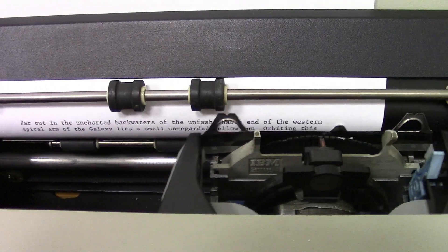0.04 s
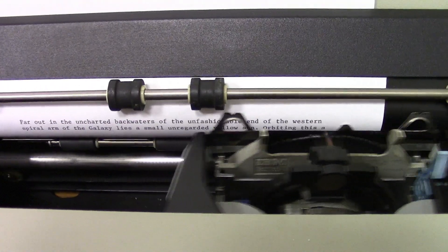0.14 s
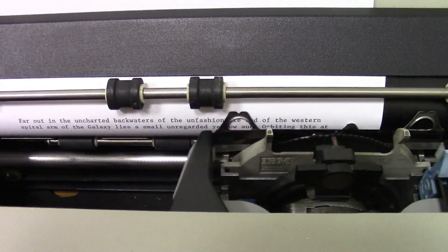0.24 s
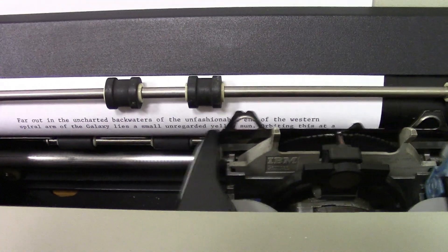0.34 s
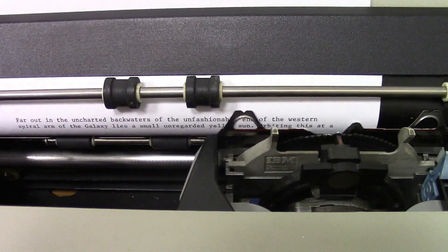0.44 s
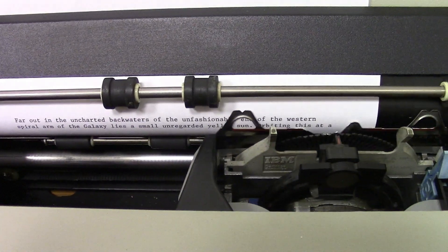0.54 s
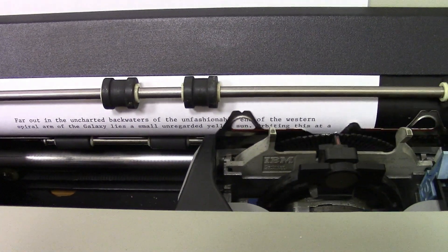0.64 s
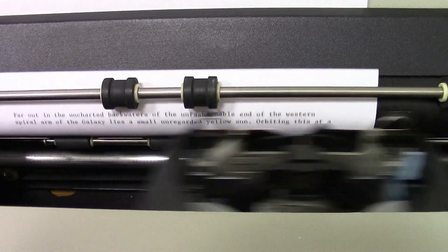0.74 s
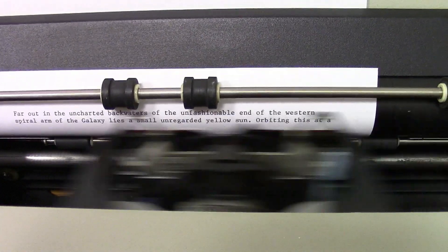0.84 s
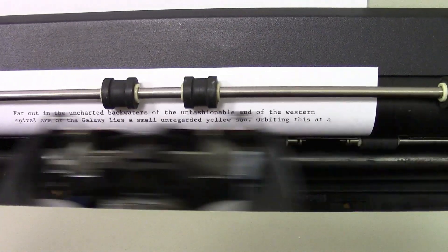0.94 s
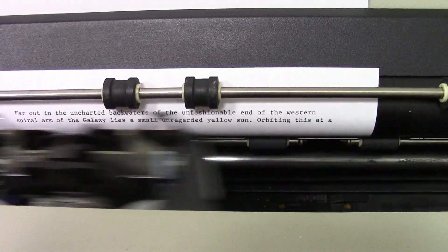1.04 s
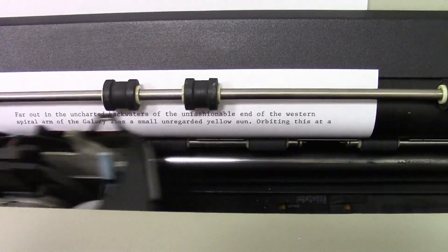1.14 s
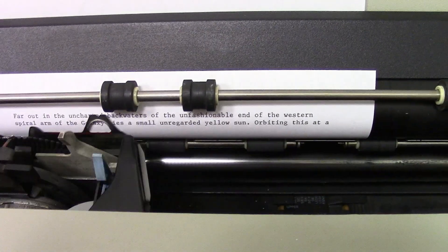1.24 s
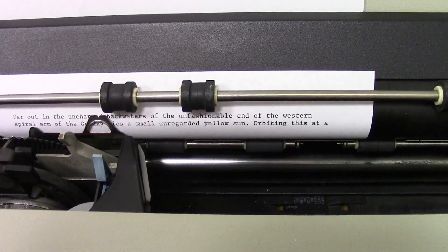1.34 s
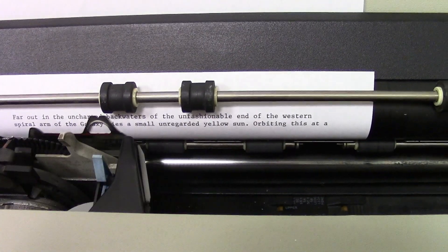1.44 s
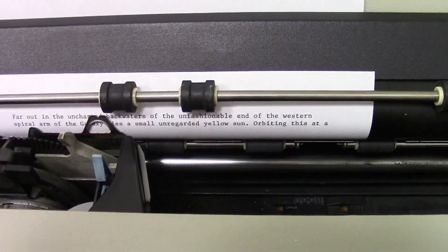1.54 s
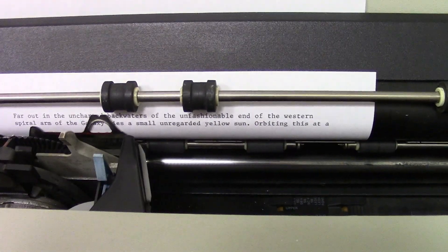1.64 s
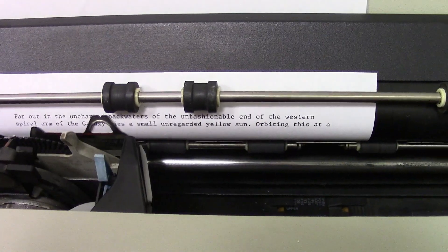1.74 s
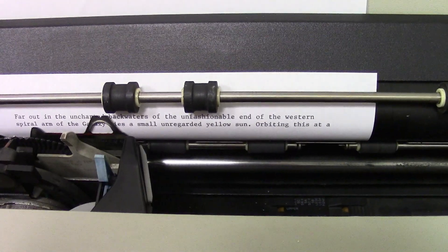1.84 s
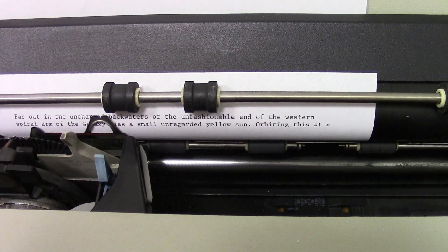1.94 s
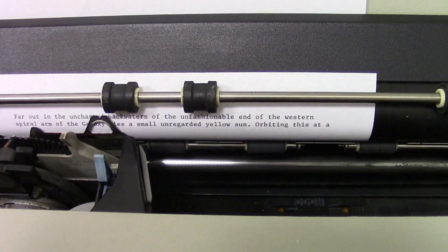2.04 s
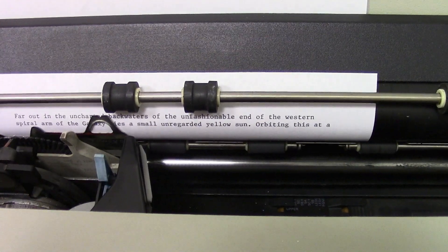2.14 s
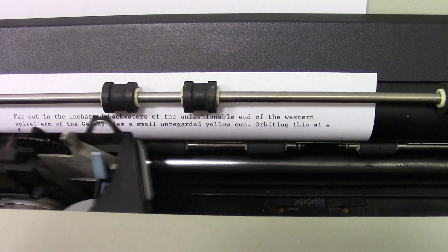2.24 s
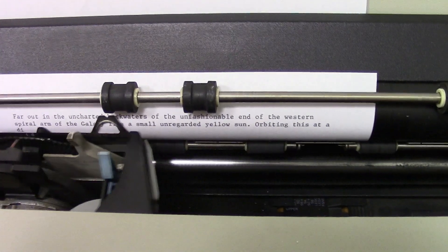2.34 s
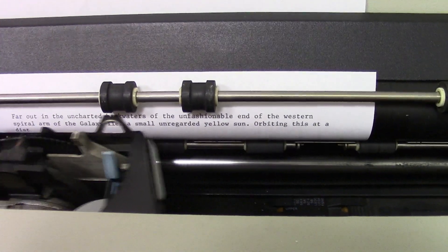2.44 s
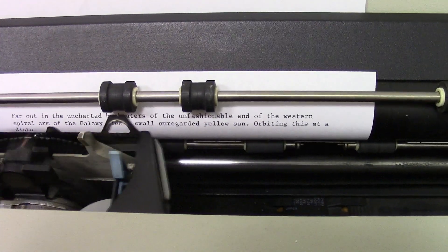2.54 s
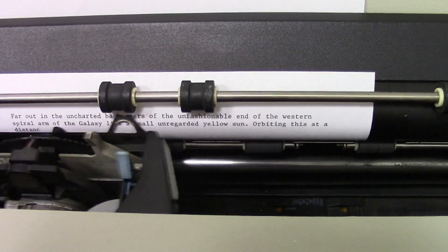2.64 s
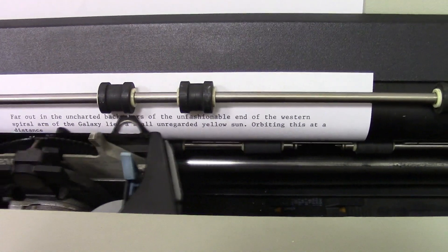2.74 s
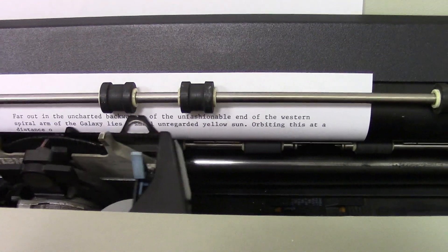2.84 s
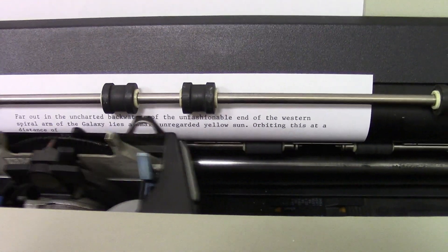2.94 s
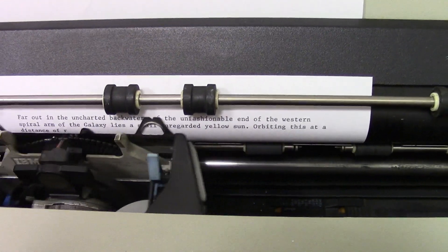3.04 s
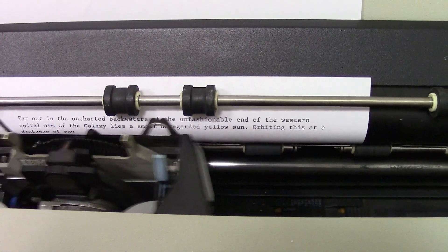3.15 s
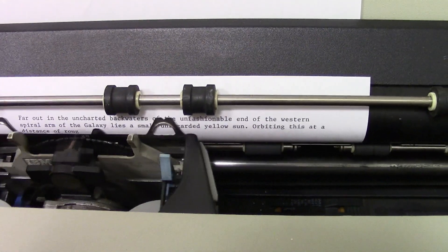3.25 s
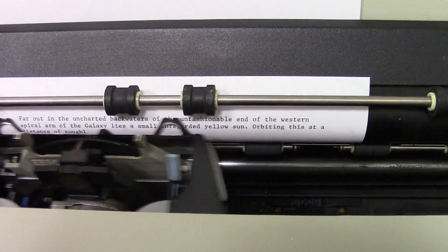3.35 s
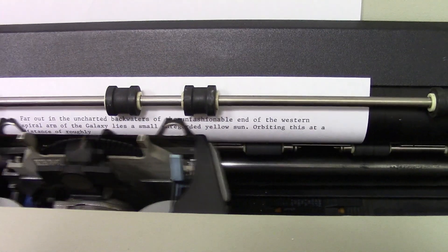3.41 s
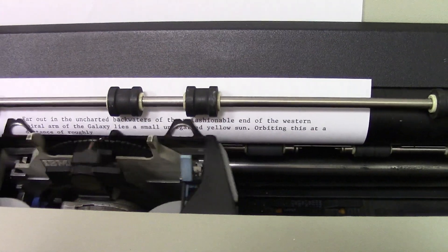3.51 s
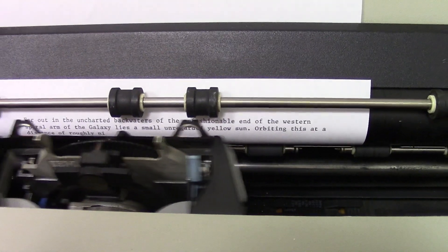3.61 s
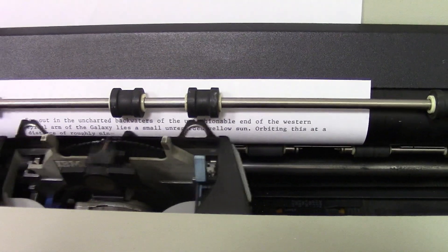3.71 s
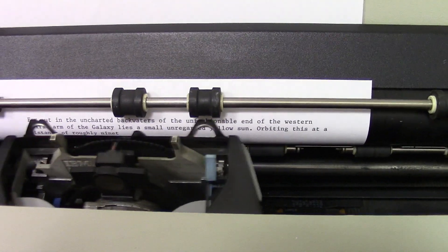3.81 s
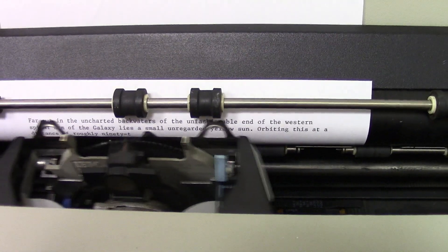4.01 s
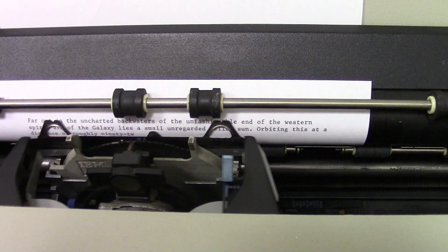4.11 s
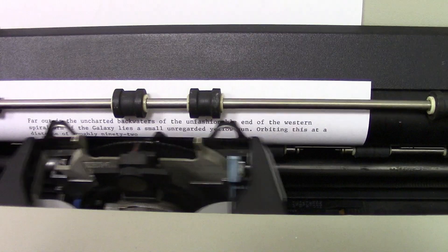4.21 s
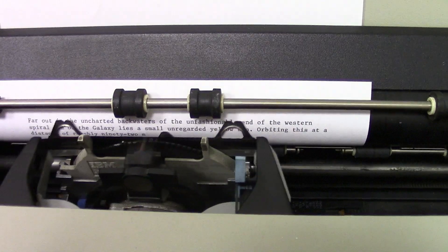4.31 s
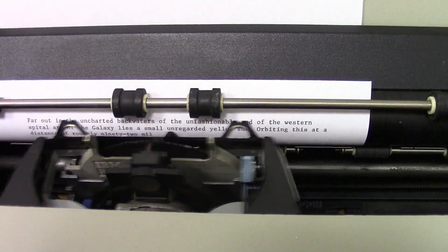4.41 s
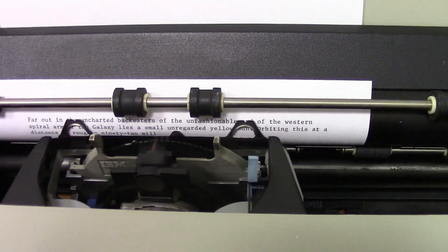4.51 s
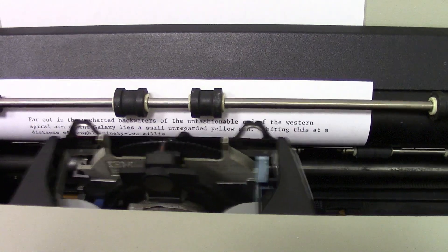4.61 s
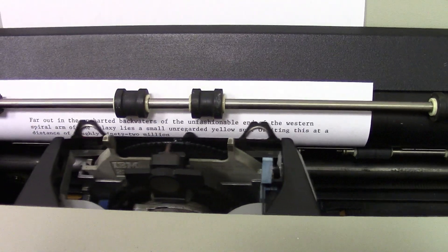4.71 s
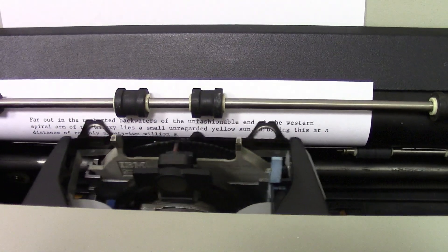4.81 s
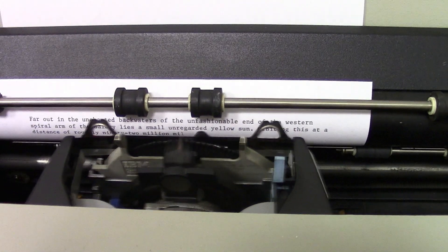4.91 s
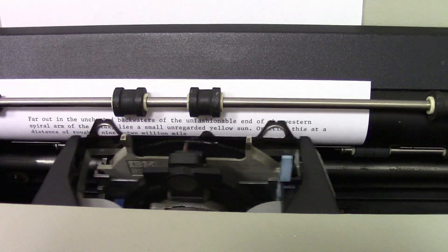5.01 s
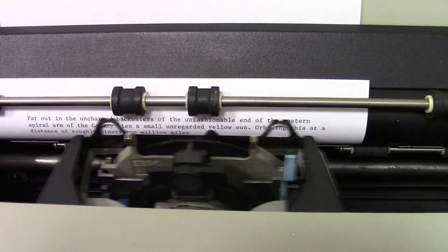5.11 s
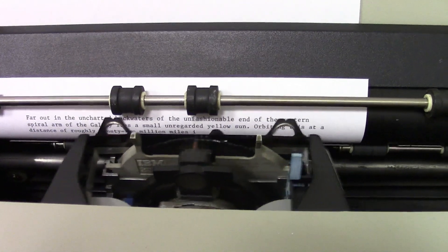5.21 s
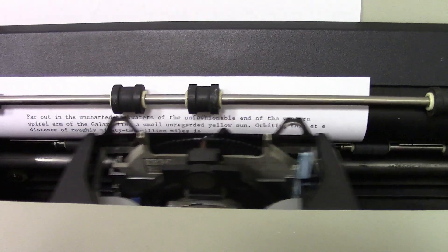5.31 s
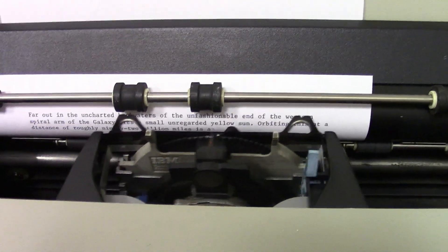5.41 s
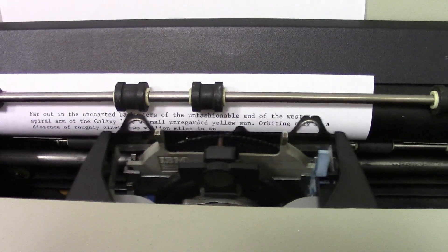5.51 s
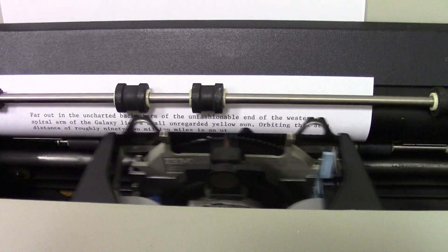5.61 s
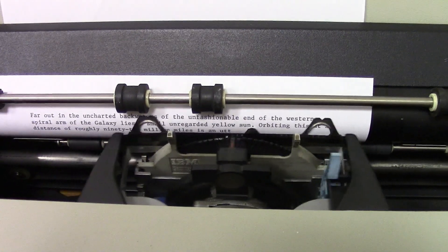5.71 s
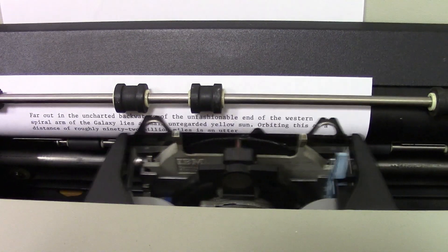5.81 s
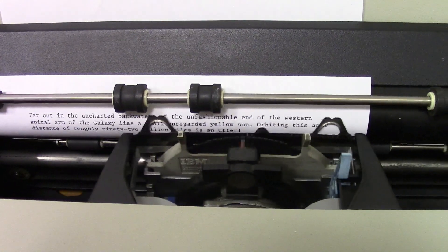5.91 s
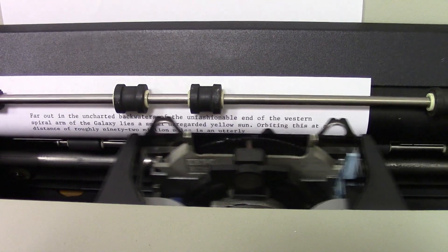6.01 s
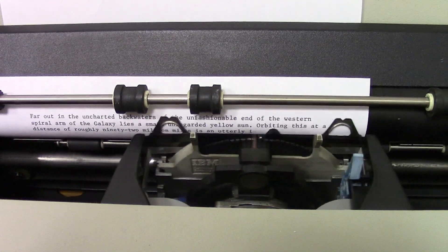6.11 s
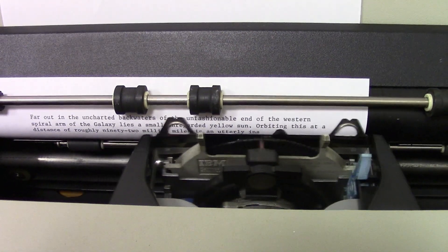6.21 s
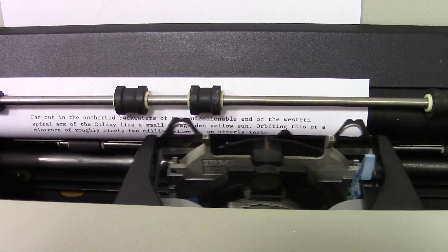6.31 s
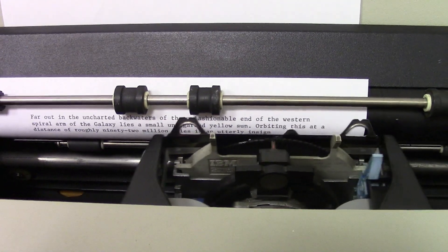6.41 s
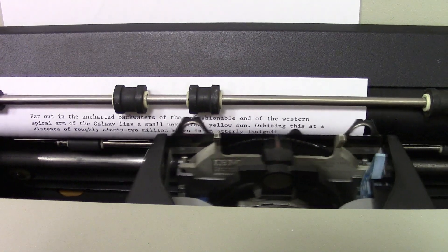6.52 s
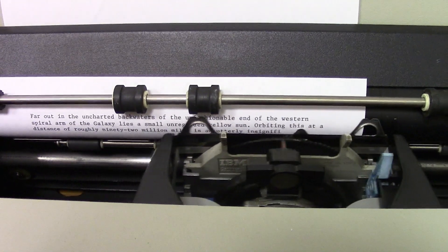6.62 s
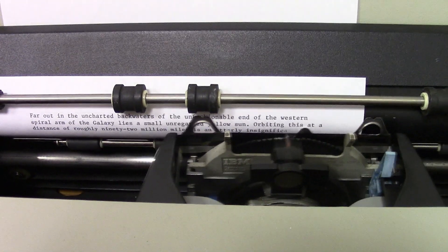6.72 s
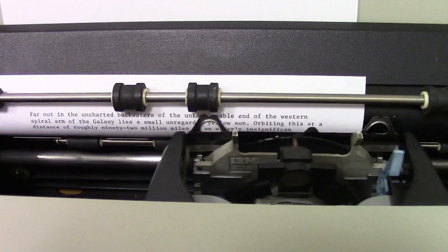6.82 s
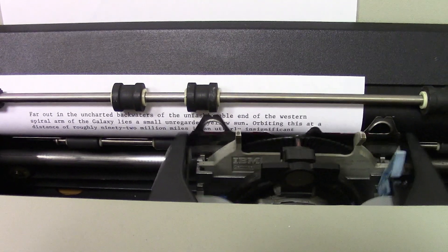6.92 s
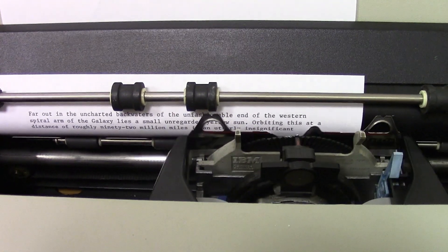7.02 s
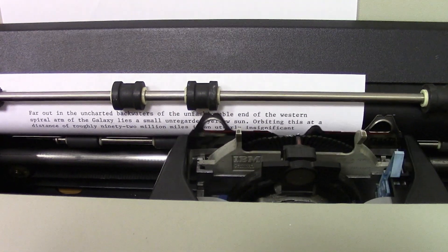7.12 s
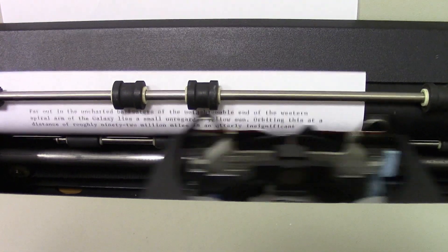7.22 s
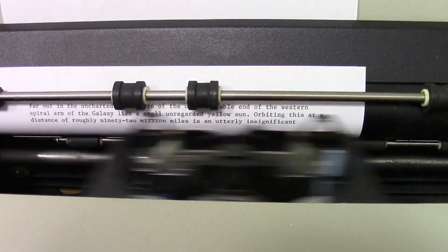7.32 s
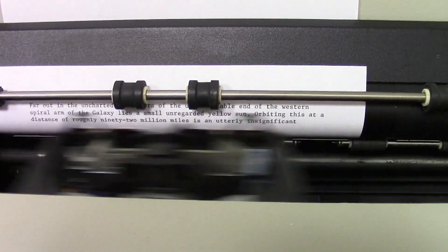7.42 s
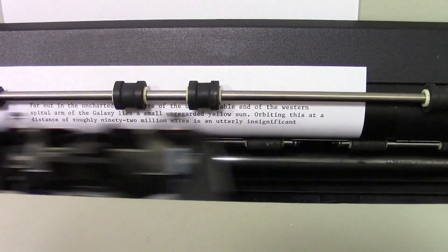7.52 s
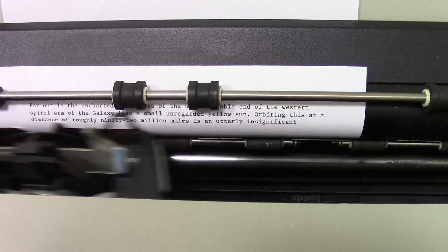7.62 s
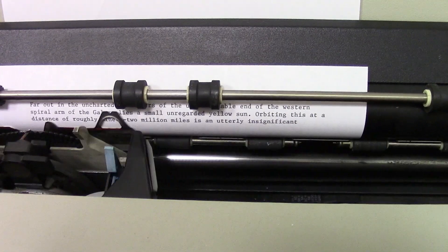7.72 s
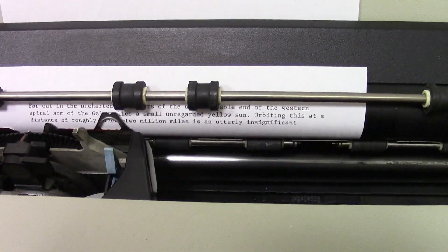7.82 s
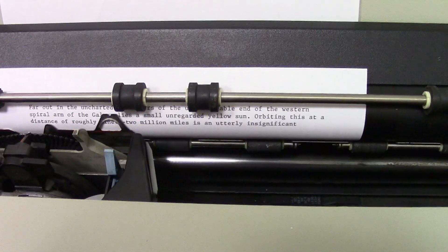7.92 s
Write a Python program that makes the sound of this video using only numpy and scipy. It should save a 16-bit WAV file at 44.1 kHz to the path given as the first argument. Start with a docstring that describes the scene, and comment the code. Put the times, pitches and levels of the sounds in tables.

```python
"""The hammer of an electric daisy-wheel typewriter strikes letters close by in a quiet room: each blow rings
damped modes of the hammer, type and platen. The carriage motor's steps excite resonances of case and desk;
the print wheel hums through the frame, and loose parts rattle as shaped noise. Twice the carriage whirs back
on its toothed belt, a sum of overtones of the motor's step rate, with jolts for starts, stops and paper feed.
Behind it lie a decaying room echo, air noise and a mains hum."""
import sys
import numpy as np
from scipy import signal
from scipy.fft import rfft, irfft, next_fast_len
from scipy.io import wavfile
from scipy.ndimage import uniform_filter1d, minimum_filter1d, map_coordinates

SR = 44100
rng = np.random.default_rng(int(sys.argv[2]) if len(sys.argv) > 2 else 0)


def convert_level_to_amplitude(level_db):
    """Map a level in decibels to its linear amplitude factor."""
    exponent = np.asarray(level_db, float) / 20
    return 10 ** exponent


def transcribe(u):
    """Save the signal u as a 16-bit wav file named by the first command-line argument.

    u: samples, shape (n,) or (channels, n), limited to [-1, 1]; the rate is SR.
    q: integer samples, one column per channel.
    """
    v = np.clip(np.atleast_2d(u).T, -1, 1)
    q = np.round(v * 32767).astype(np.int16)
    wavfile.write(sys.argv[1], SR, q)


N = 350595
LEAD = SR // 4  # samples kept before the start, for events that begin early
COLUMN_S = .0624  # one print cycle

# hammer blows: start_s, level_db
STRIKES = [(0.0296, -7.0), (0.096, -7.0), (0.2206, -8.0), (0.2831, -7.5), (0.4078, -7.5), (2.3262, -7.0),
           (2.3924, -7.0), (2.4588, -7.0), (2.5231, -6.0), (2.5854, -6.5), (2.6478, -6.0), (2.7102, -6.5),
           (2.7725, -6.5), (2.8974, -7.5), (2.967, -7.0), (3.0918, -7.0), (3.1541, -7.0), (3.2162, -6.0),
           (3.2786, -5.5), (3.3525, -5.5), (3.4151, -7.0), (3.4967, -6.5), (3.6215, -7.5), (3.6839, -7.0),
           (3.7464, -6.5), (3.8087, -6.5), (3.872, -7.0), (3.9344, -6.0), (4.0119, -13.0), (4.0932, -7.5),
           (4.1593, -6.0), (4.2255, -7.5), (4.3501, -7.0), (4.4127, -8.0), (4.4843, -7.5), (4.5467, -8.0),
           (4.6183, -8.0), (4.6807, -7.5), (4.743, -7.5), (4.8676, -6.0), (4.9302, -8.0), (5.0018, -7.5),
           (5.0682, -8.0), (5.1306, -8.0), (5.2554, -9.0), (5.3218, -8.5), (5.4466, -8.5), (5.5089, -7.5),
           (5.6335, -6.5), (5.6961, -7.0), (5.7585, -7.5), (5.8208, -6.0), (5.8832, -6.5), (5.9456, -6.5),
           (6.0271, -6.5), (6.1519, -6.5), (6.2143, -6.0), (6.2767, -5.5), (6.3431, -6.0), (6.4052, -6.0),
           (6.468, -7.5), (6.5304, -7.5), (6.6039, -7.5), (6.6776, -8.0), (6.7417, -7.5), (6.8041, -7.0),
           (6.8666, -7.0), (6.929, -7.0)]
# carriage place along the line: time_s, place (0 left, 1 right)
PLACE = [(0, .9), (.5, 1), (2.3, 0), (6.95, 1)]
# modes of hammer, type and platen: pitch_hz, t60_s, then level_db at left, one third, two thirds, right
PLATEN_MODES = [(560, .046, 8.5, -2, -5, -17), (654, 0.059, 1, -8, -3, -13), (900, 0.029, -5, -20, -3, -3),
                (1310, 0.035, 1, 3.5, 5, 1), (1504, 0.033, 8, 9.5, 4, 5), (1820, 0.02, 13.5, 3.5, 4, 0),
                (2362, 0.035, 8.5, 10.5, 10.5, 3.5), (2734, 0.022, -8, -29, -4, 3.5),
                (2927, 0.031, 5, 0.5, 5, 9.5), (3172, 0.024, 10, 12, 11, 9), (3443, 0.045, 2, 8, -12, -7),
                (3647, 0.015, 0, 4, 13.5, 14), (3807, 0.023, -10, 2, 19, 20.5),
                (3933, 0.037, 14.5, 15, 9.5, 15.5), (4170, .0216, 14, 19.5, 4, 12.5),
                (4506, 0.016, 15, 15, 10.5, 10), (4586, .013, 13, 5, 7, 4), (4994, 0.038, 1, 4, 6, 2),
                (5210, .0144, 1, -1, 11, 16), (5796, 0.021, 4, 12, 16.5, 14.5),
                (6180, 0.011, 2, 7, 12.5, 17.5), (6230, 0.016, 3.5, 15, 11, 7),
                (6590, 0.023, 4, 5.5, 3, -8), (7020, 0.033, 1, 0, 3, -2), (7600, 0.064, -14, -16, -7, -14),
                (8500, 0.0048, -2, -9, 1, -7), (8720, 0.021, 1, 0, 0, -9), (9050, 0.033, -6, 1, 1, -4)]
# noise spectrum of the blow: frequency_hz, relative_level_db (per Hz)
CRACK_SPECTRUM = [(410, -49), (700, -31), (1040, -11), (1450, 4), (2800, -2.5), (3990, 13.5), (4860, -8),
                  (5920, 4.5), (7590, -18.5), (9110, -15), (12000, -21.5), (16000, -32)]
# contacts of one stroke (hammer sets off, type lands, hammer falls back on its stop):
# after_s, level_db (relative to the blow), time_scatter_s, mode_scatter_db
STROKE_CONTACTS = [(-.0016, -21, .00005, 3), (.0012, 0, 0, 1.4), (.0212, -19, .0003, 5)]
# motor steps of one column advance: after_s (from the cycle's start), push (signed, relative)
ADVANCE_STEPS = [(0, 1.48), (.004, -0.9), (0.0095, -0.15), (0.015, -1.36), (.022, 0.5), (0.025, -2),
                 (0.034, 1), (0.0406, -1), (.049, -0.6), (.056, 1.4)]
# resonances of the case: centre_hz, width_hz, gain_db
CASE_MODES = [(225.4, 13.7, -15), (242.2, 13, -12), (262, 35.5, -9), (340.9, 10, -7.5), (426.8, 32, -7),
              (512, 54, -7), (565, 114, -11.5), (792, 100, -17), (893, 31.6, -12), (1252, 100, -22.5)]
# long-ringing modes of desk and frame: centre_hz, width_hz, delay_s, then gain_db at left, middle, right
DESK_MODES = [(31.12, 4.7, 0.0134, 30, 26, 25), (81, 10, 0.0145, 14, 24, 15),
              (110.2, 14.3, 0.01518, 31.5, 25.3, 24.9), (289.5, 16, .036, 29, 33.8, 36.5)]
# turns of the wheel motor to the next letter: middle_s, length_s (before stretching),
# hum_db (relative drive of the frame), whirr_db
WHEEL_TURNS = [(0.006, 0.022, -31, -40), (0.067, 0.056, -30.5, -36), (0.133, 0.036, -27.5, -39),
               (0.2, 0.042, -32, -41), (0.259, 0.053, -31.0, -40), (0.317, 0.039, -26.5, -40.5),
               (0.384, 0.029, -26.5, -41), (0.452, 0.036, -31, -41), (0.498, 0.067, -54, -45.5),
               (2.282, 0.084, -49, -47), (2.352, 0.055, -31, -35), (2.423, 0.057, -32, -35),
               (2.484, 0.064, -33.0, -32.5), (2.54, 0.043, -36, -31.5), (2.613, 0.061, -35, -40),
               (2.673, 0.063, -37.5, -42), (2.734, 0.044, -37, -39), (2.792, 0.056, -38, -52),
               (2.871, 0.046, -37, -51), (2.931, 0.047, -33, -35), (2.998, 0.058, -33, -39),
               (3.067, 0.037, -34, -47), (3.121, 0.056, -32.5, -37), (3.183, 0.049, -32, -35),
               (3.25, 0.034, -36, -43), (3.315, 0.055, -32, -39), (3.385, 0.063, -38, -42),
               (3.45, 0.058, -33, -39), (3.524, 0.057, -33, -45), (3.597, 0.045, -34, -42),
               (3.652, 0.06, -33.5, -43), (3.71, 0.052, -33, -38), (3.774, 0.048, -34.5, -37),
               (3.835, 0.053, -32, -36.0), (3.896, 0.043, -35, -34.5), (3.97, 0.056, -35.5, -34.5),
               (4.049, 0.056, -38, -35), (4.12, 0.066, -41, -40), (4.193, 0.049, -31, -35),
               (4.26, 0.051, -34, -35.5), (4.324, 0.036, -37, -49), (4.387, 0.05, -34.0, -38),
               (4.445, 0.057, -35.5, -35), (4.516, 0.057, -32, -38), (4.576, 0.063, -36.0, -33),
               (4.639, 0.05, -31, -36), (4.702, 0.047, -31.5, -31), (4.764, 0.065, -33, -35),
               (4.849, 0.047, -34, -44), (4.899, 0.07, -32, -35), (4.962, 0.057, -32.5, -34),
               (5.028, 0.05, -38, -32), (5.095, 0.043, -30, -31.5), (5.163, 0.051, -31.0, -37.5),
               (5.235, 0.036, -32, -42), (5.291, 0.048, -31, -36), (5.349, 0.048, -27, -37),
               (5.425, 0.047, -40, -45), (5.478, 0.039, -28.5, -40), (5.542, 0.049, -29, -38),
               (5.613, 0.033, -33, -42), (5.667, 0.05, -32, -35), (5.728, 0.054, -28, -36),
               (5.784, 0.055, -32, -34), (5.852, 0.04, -27, -32), (5.913, 0.048, -26.5, -35),
               (5.979, 0.057, -33, -34), (6.06, 0.041, -26.5, -35), (6.13, 0.057, -34.0, -43),
               (6.183, 0.041, -31.5, -31.5), (6.243, 0.041, -26, -33), (6.31, 0.045, -25, -34),
               (6.373, 0.039, -27.5, -39), (6.448, 0.039, -37, -38), (6.499, 0.039, -28, -44),
               (6.573, 0.049, -31, -44), (6.644, 0.046, -30, -39), (6.714, 0.037, -27.5, -40),
               (6.781, 0.048, -30.5, -42), (6.84, 0.049, -31, -43), (6.908, 0.067, -31.5, -40),
               (6.968, 0.04, -32, -40), (7.034, 0.09, -67, -46)]
# the wheel starts, brakes or settles: start_s, level_db, clack_pitch_hz
WHEEL_CLACKS = [(.004, -23.5, 2960), (0.173, -22.5, 2870), (0.3551, -22.5, 2785), (.477, -33, 2540),
                (0.5235, -29.5, 2220), (.556, -40, 2570), (2.25, -25, 3380), (2.292, -29.5, 2770),
                (2.8497, -29.5, 2652), (3.049, -27, 2743), (3.5698, -30.5, 2860), (4.3015, -22, 2820),
                (4.811, -24, 2880), (4.845, -30, 1607), (5.207, -26.5, 3040), (5.2297, -44, 2870),
                (5.398, -24, 3050), (5.5853, -25.5, 3170), (6.095, -22.5, 2770), (7.001, -24, 2966),
                (7.043, -34, 3060), (7.089, -40, 3030)]
# loose parts clack during the returns: start_s, level_db, clack_pitch_hz
RETURN_CLACKS = [(.756, -48, 2490), (.815, -44, 2500), (.885, -44, 1750), (1.18, -43, 1630),
                 (1.265, -45, 3400), (1.383, -42.5, 1630), (1.41, -48, 2295), (7.281, -45, 3080),
                 (7.283, -51, 4200), (7.39, -47, 3887), (7.41, -44, 1730), (7.66, -43, 1600),
                 (7.695, -47, 2450), (7.872, -44.5, 1600), (7.9, -49, 1660)]
# small contacts in every cycle: after_s (from the blow), level_db (shifted by the blow's level),
# rise_s (time constant), t60_s, tilt_db (per octave)
CYCLE_CONTACTS = [(-.0016, -26, .0004, .03, 2), (.001, -24.5, .004, 0.13, -1),
                  (0.0209, -27.5, .0008, 0.073, 2.5), (.039, -30, .0015, 0.038, -1)]
# noise spectrum of the loose parts: frequency_hz, relative_level_db (per Hz)
RATTLE_SPECTRUM = [(410, -9), (700, -3.5), (898, -7), (1380, -7.5), (1560, -4.5), (2020, -9.5), (2800, -4),
                   (4860, -12), (6070, -13.5), (7990, -19), (8760, -14), (9860, -24.5), (16000, -52)]
# carriage returns: start_s, brake_s, top_speed_hz (motor steps), belt_db, belt_tilt_db (per octave)
RETURNS = [(0.751, 1.106, 653.5, -36.5, 0.9), (7.272, 7.59, 644.5, -37.5, -0.5)]
# motor overtones: multiple of the step rate, relative level_db in the first return, in the second
WHINE_OVERTONES = [(1, 13, 10.5), (3, 4.5, 6), (5, -4, -7), (6, -7, -8), (8, -3, -8), (9, -8, -17),
                   (10, -7, -11), (11, -8, -17), (13, -10, -9), (14, -19, -27)]
# belt overtones: multiple of the tooth rate, relative level_db
TOOTH_OVERTONES = [(1, -2), (2, -13), (3, -29), (4, -30), (5, -21)]
# the carriage gathers speed: after_s (from the start), speed (share of top speed)
SPEED_UP = [(0, .42), (.05, .62), (.1, .78), (.15, .93), (.195, 1)]
# the carriage brakes: after_s (from braking), speed (share of top speed)
SLOW_DOWN = [(0, 1), (.04, .92), (.075, .79), (.105, .62), (.135, .45), (.165, .27), (.2, .18), (.26, .096)]
# the frame's answer to the whine: frequency_hz, gain_db
FRAME_RESPONSE = [(100, -10), (290, -8), (430, -7), (600, -2), (900, 11), (1100, 3), (1350, 1), (1600, 8),
                  (1800, 0), (1950, 2)]
# desk rumble against speed: speed (share of top speed), level_db (before braking)
DESK_RUMBLE = [(.09, -68), (.17, -36), (.3, -42), (.42, -43), (.62, -47.5), (.9, -42.5), (1, -64)]
# jolts as a return starts: after_s, level_db (drive of the case), t60_s
START_JOLTS = [(.002, -32, 0.17)]
# jolts after braking begins, from the stop and the paper feed: after_s, level_db (drive of the case), t60_s
STOP_JOLTS = [(.142, -29.5, 0.3), (.16, -23.5, 0.075), (.277, -25, 0.1), (.305, -31, .15)]
# the carriage takes up the new line: start_s, level_db (drive of the case), t60_s
LINE_START = (2.275, -30, 0.044)
# decay of the room: frequency_hz, t60_s
ROOM_DECAY = [(100, 0.69), (500, 0.5), (3000, 0.44), (10000, 0.21)]
# spectrum of quiet room and microphone hiss: frequency_hz, relative_level_db (per Hz)
AIR_SPECTRUM = [(18, -39), (30, 1), (64, -11), (86, -10), (106, -4.5), (127, -29), (157, -13),
                (2350, -23.5), (2610, -24), (3980, -24), (4910, -25.5), (13700, -29.5), (16000, -36)]


def unit(x):
    """Normalisation: a signal divided by its root mean square."""
    return x / np.sqrt(np.mean(x ** 2) + 1e-20)


def along(points, hz):
    """Interpolation of (frequency, value) points on a logarithmic frequency axis."""
    f, v = np.transpose(points)
    return np.interp(np.log(hz + 1), np.log(f + 1), v)


def filtered(x, response):
    """Linear filtering: the spectrum is multiplied by a response of frequency."""
    size = next_fast_len(len(x) + SR // 2)
    return irfft(rfft(x, size) * response(np.fft.rfftfreq(size, 1 / SR)), size)[:len(x)]


def noise(spectrum, tilt_db=0):
    """Coloured noise: white noise shaped by a spectrum, tilted per octave about 4 kHz, at rms 1."""
    def gain(hz):
        return convert_level_to_amplitude(along(spectrum, hz) + tilt_db * np.log2((hz + 1) / 4000))
    return unit(filtered(rng.standard_normal(N), gain))


def wobble(rate_hz):
    """Random modulation: a smooth curve through rate_hz random knots a second."""
    knots = rng.standard_normal(int(N * rate_hz / SR) + 4)
    return map_coordinates(knots, [np.arange(N) * rate_hz / SR])


def add(track, s, piece):
    """Superposition: a piece is added at time s to a track that has a lead-in."""
    first = LEAD + round(s * SR)
    track[first:][:len(piece)] += piece[:len(track) - first]


def bursts(rows):
    """Incoherent addition: the envelope of (s, dB, rise s, t60 s) swells, summed in power."""
    power, t = np.zeros(LEAD + N), np.arange(SR // 2) / SR
    for s, db, rise, t60 in rows:
        swell = convert_level_to_amplitude(db - 60 * t / t60) * (1 - np.exp(-t / rise))
        add(power, s, swell ** 2)
    return np.sqrt(power[LEAD:])


def resonance(hz, centre, width):
    """Driven damped oscillator: one causal resonance with unit gain at its centre."""
    return 1j * hz * width / (centre ** 2 - hz ** 2 + 1j * hz * width)


def hammer():
    """Impact excitation: contacts ring nearly the same damped modes, balanced by the carriage's place."""
    blow_rms_db = -22.5  # rms of the modes in one blow, relative to its listed level
    tick_db, tick_damping = -26.5, 2.1  # linkage ticks ring the same modes, shorter
    out, t = np.zeros(LEAD + N), np.arange(SR // 12) / SR
    modes = np.array(PLATEN_MODES)
    hz, t60, levels_db = modes[:, :1], modes[:, 1:2], modes[:, 2:]
    onset = 1 - np.exp(-(t / .00012) ** 2)
    # every third mode starts the other way
    sign = np.where(np.arange(len(hz)) % 3 == 1, -1, 1)[:, None]
    rings = sign * np.sin(2 * np.pi * hz * t) * onset
    long_rings = rings * convert_level_to_amplitude(-60 * t / t60)
    short_rings = rings * convert_level_to_amplitude(-60 * tick_damping * t / t60)
    chance = rng.standard_normal((len(STRIKES), len(STROKE_CONTACTS) + 3, len(modes) + 1))
    tick_times = rng.uniform(.008, COLUMN_S - .006, (len(STRIKES), 3))
    loose = noise(CRACK_SPECTRUM)
    alike = noise(CRACK_SPECTRUM)[:2 * len(t)].reshape(2, -1)  # one repeated crack for each end of the line
    crack_envelope = onset * convert_level_to_amplitude(13.5 - 60 * t / .036)
    for (s, db), luck, ticks in zip(STRIKES, chance, tick_times):
        place = np.interp(s, *np.transpose(PLACE))
        mode_db = np.array([np.interp(place, [0, 1 / 3, 2 / 3, 1], row) for row in levels_db])
        size = convert_level_to_amplitude(db + blow_rms_db) / np.sqrt(np.mean((convert_level_to_amplitude(mode_db) @ long_rings) ** 2))
        grain = np.sqrt([1 - place, place]) @ alike + .4 * loose[round(s * SR):][:len(t)]
        crack = crack_envelope * grain
        for (after, contact_db, slip, scatter_db), r in zip(STROKE_CONTACTS, luck):
            ring = convert_level_to_amplitude(mode_db + scatter_db * r[1:]) @ long_rings
            add(out, s + after + slip * r[0], size * convert_level_to_amplitude(contact_db) * (ring + crack))
        for after, r in zip(ticks, luck[len(STROKE_CONTACTS):]):
            ring = convert_level_to_amplitude(mode_db + 5 * r[1:]) @ short_rings
            add(out, s + after, size * convert_level_to_amplitude(tick_db + 3 * r[0]) * ring)
    return out[LEAD:]


def cycles():
    """Periodic drive: start times and dB of column advances, one before the line, one a letter or space."""
    space_db = -5  # an advance without a blow shakes less
    s = np.transpose(STRIKES)[0]
    gap = np.diff(s)
    is_space = (gap > 1.7 * COLUMN_S) & (gap < 4 * COLUMN_S)
    spaces = s[:-1][is_space] + COLUMN_S
    return np.r_[s[0] - COLUMN_S, s, spaces], np.r_[0, 0 * s, space_db + 0 * spaces]


def case(hz):
    """Modal superposition: the resonances of the case, alternating in sign."""
    return sum((-1) ** k * convert_level_to_amplitude(db) * resonance(hz, centre, width)
               for k, (centre, width, db) in enumerate(CASE_MODES))


def desk(pushes):
    """Modal coupling: delayed modes of desk and frame are driven according to the carriage's place."""
    place = np.interp((np.arange(len(pushes)) - LEAD) / SR, *np.transpose(PLACE))
    out = np.zeros(len(pushes))
    for centre, width, delay, *gains_db in DESK_MODES:
        drive = pushes * convert_level_to_amplitude(np.interp(place, [0, .5, 1], gains_db))
        out += filtered(drive, lambda hz: resonance(hz, centre, width) * np.exp(-2j * np.pi * hz * delay))
    return out


def advance():
    """Impulse response: motor steps jolt the case over a looser shudder, and each start pushes the desk."""
    (start, level_db), (after, push) = cycles(), np.transpose(ADVANCE_STEPS)
    chance = rng.standard_normal((len(start), 2, len(after)))
    at = LEAD + np.round((start[:, None] + after + 0.00025 * chance[:, 0]) * SR).astype(int)
    strength = push * convert_level_to_amplitude(level_db[:, None] + 1.7 * chance[:, 1])
    jolts = np.bincount(at.ravel(), strength.ravel(), LEAD + N)
    rows = []
    for s, db in zip(start, level_db):
        place = np.interp(s, *np.transpose(PLACE))
        rows.append((s + 0.0048, db - 5.0 - 4 * place, .006, .4))
    shudder = bursts(rows) * rng.standard_normal(N)
    sets_off = LEAD + np.round(start * SR).astype(int)
    pushes = np.bincount(sets_off, convert_level_to_amplitude(rng.normal(0, 1.6, len(start))), LEAD + N)
    pushes = filtered(pushes, lambda hz: 1 / (1 + 1j * hz / 150) ** 2)  # a soft push, a few ms long
    shaken = filtered(convert_level_to_amplitude(18.5) * jolts + np.pad(shudder, (LEAD, 0)), case)
    return (shaken + desk(pushes))[LEAD:]


FRAME_HUM_HZ = 416.1  # the frame's note under the wheel motor


def wheel_turns():
    """Forced vibration: each wheel turn drives the frame on one note and whirrs through the loose parts."""
    stretch, ring_width_hz = 1.25, 260  # swell over listed length; width of the frame's ring
    hum, whirr = np.zeros(LEAD + N), np.zeros(LEAD + N)
    chance = rng.standard_normal((len(WHEEL_TURNS), 2))
    starts = np.sort(cycles()[0])
    for (middle, length, hum_db, whirr_db), (phase, detune) in zip(WHEEL_TURNS, chance):
        t = np.arange(round(stretch * length * SR)) / SR
        begin = middle - t[-1] / 2
        # the phase keeps roughly in step with the nearest print cycle
        nearest = starts[np.argmin(np.abs(starts + COLUMN_S / 2 - middle))]
        since = t + begin - nearest
        swell = np.sin(np.pi * t / (len(t) / SR)) ** 0.69
        note = np.sin(2 * np.pi * (FRAME_HUM_HZ * since + 2 * detune * t) + .8 * phase)
        add(hum, begin, convert_level_to_amplitude(hum_db + 2) * swell * note)
        add(whirr, begin + 0.0046, convert_level_to_amplitude(whirr_db) * swell)
    rough = np.pad(convert_level_to_amplitude(1.07 * wobble(60)), (LEAD, 0), "edge")
    ring = filtered(hum * rough, lambda hz: 1.03 * resonance(hz, FRAME_HUM_HZ, ring_width_hz))
    return ring[LEAD:] + whirr[LEAD:] * noise(RATTLE_SPECTRUM, -0.91) * convert_level_to_amplitude(3.85 * wobble(300))


def rattle():
    """Amplitude-modulated noise: loose parts buzz around each blow and clack with the wheel and the returns."""
    rise_s, t60_s = 0.005, 0.099
    wheel_share, return_share = 0.17, .45  # power share of the clack; return clacks ring more
    out, t = np.zeros(N), np.arange(N) / SR
    buzz, flutter = noise(RATTLE_SPECTRUM, 1), unit(wobble(350))
    for table, share in ((WHEEL_CLACKS, wheel_share), (RETURN_CLACKS, return_share)):
        for s, db, hz in table:
            clack = flutter * np.sqrt(2) * np.sin(2 * np.pi * hz * t)  # a narrow, rough ring
            envelope = bursts([(s - 0.9 * rise_s, db, rise_s, t60_s)])
            out += envelope * (np.sqrt(1 - share) * buzz + np.sqrt(share) * clack)
    for after, level_db, rise, t60, tilt_db in CYCLE_CONTACTS:
        scatter = rng.normal(0, 2.13, len(STRIKES))
        # the contacts follow half of the blow's level in dB
        rows = [(s + after, level_db + .5 * (db + 4.5) + d, rise, t60)
                for (s, db), d in zip(STRIKES, scatter)]
        out += bursts(rows) * noise(RATTLE_SPECTRUM, tilt_db)
    return out * convert_level_to_amplitude(1.7 * wobble(350))  # grainy, not smooth


def carriage_return():
    """Harmonic synthesis: overtones follow the step rate; the belt teeth sound a rougher note just below."""
    whine_db, brake_gain_db, ramp_loss_db = -58, 3, 54  # louder in braking, fainter while gathering speed
    hiss_db, hiss_loss_db = -51, 10  # belt hiss at speed, and its loss towards standstill
    rumble_db, brake_boom_db = -45, -15  # case rumble at speed; change of desk boom in braking, times speed
    teeth_per_step = 15 / 16
    t, out = np.arange(N) / SR, np.zeros(N)
    rumble = unit(filtered(rng.standard_normal(N), case))
    hiss = noise(RATTLE_SPECTRUM, -1.8)
    boom = unit(filtered(rng.standard_normal(N), lambda hz: sum(
        resonance(hz, centre, width) for centre, width, *_ in DESK_MODES[1:3])))
    for which, (start, brake, top_hz, belt_db, tilt_db) in enumerate(RETURNS):
        gathering = np.interp(t - start, *np.transpose(SPEED_UP))
        stopping = np.interp(t - brake, *np.transpose(SLOW_DOWN))
        speed = np.clip(np.where(t < brake, gathering, stopping), 0, 1)
        slow, braking = 1 - speed, np.clip((t - brake) / 0.042, 0, 1)
        # the rotor hunts on the ramps
        hunting = (2.2 - .9 * braking) * slow * wobble(200) + .06 * wobble(60)
        turns = 2 * np.pi * np.cumsum(top_hz * speed) / SR + hunting
        whine = np.zeros(N)
        for k, *levels_db in WHINE_OVERTONES:
            frame_db = along(FRAME_RESPONSE, k * top_hz * speed)
            high_loss_db = 3.7 * max(k - 3, 0) * slow
            flicker_db = (2.5 + 2.6 * slow) * wobble(40)
            whine += convert_level_to_amplitude(levels_db[which] + frame_db - high_loss_db + flicker_db) * np.sin(k * turns)
        whine *= convert_level_to_amplitude(whine_db + brake_gain_db * braking - ramp_loss_db * slow * (1.5 - 1.3 * braking))
        teeth = teeth_per_step * turns + 0.54 * wobble(45)
        belt = np.zeros(N)
        for k, db in TOOTH_OVERTONES:
            belt += convert_level_to_amplitude(db + tilt_db * np.log2(k) + 3 * wobble(45)) * np.sin(k * teeth)
        belt *= convert_level_to_amplitude(belt_db - 30 * slow - 3.9 * braking)  # the belt sings best near full speed
        desk_db = np.interp(speed, *np.transpose(DESK_RUMBLE)) + brake_boom_db * braking * speed
        case_db = rumble_db + 3.1 * slow * (4.5 - braking) - 7.9 * slow * braking
        sound = np.sqrt(2) * (whine + belt) + convert_level_to_amplitude(hiss_db - hiss_loss_db * slow ** 2) * hiss
        sound += convert_level_to_amplitude(case_db) * rumble + convert_level_to_amplitude(desk_db) * boom
        end = brake + SLOW_DOWN[-1][0]
        out += sound * np.clip(np.minimum((t - start) / 0.011, (end - t) / 0.094), 0, 1)
    return out


def return_jolts():
    """Repeated excitation: every return has the same jolts, as (s, case drive dB, t60 s)."""
    rows = []
    for start, brake, *_ in RETURNS:
        for at, table in ((start, START_JOLTS), (brake, STOP_JOLTS)):
            rows += [(at + after, db, t60) for after, db, t60 in table]
    return rows


def thumps():
    """Impulse and noise excitation: starts, stops and paper feed knock the case, then shake it briefly."""
    tilt_db, knock_db, ring_db = -6, 24, -5  # dullness per octave; knock over shake; ring of a frame mode
    jolts = return_jolts()
    rows = [(s, db, .002, t60) for s, db, t60 in jolts + [LINE_START]]
    shake = bursts(rows) * rng.standard_normal(N)
    s, db, _ = np.transpose(jolts)
    knocks = np.bincount(np.round(s * SR).astype(int), convert_level_to_amplitude(db + knock_db), N + SR)[:N]

    def body(hz):
        dull = convert_level_to_amplitude(tilt_db * np.log2((hz + 50) / 350))
        frame_ring = convert_level_to_amplitude(ring_db) * resonance(hz, *DESK_MODES[3][:2])
        return (case(hz) + 0.29 * resonance(hz, FRAME_HUM_HZ, 30)) * dull + frame_ring
    return convert_level_to_amplitude(21) * filtered(shake + knocks, body)


def room(x):
    """Reverberation: convolution with a noise tail in which each frequency dies at its own speed."""
    hz, t, z = signal.stft(rng.standard_normal(SR // 2), SR, nperseg=256)
    hz = hz[:, None]
    decay = convert_level_to_amplitude(-2.5 * np.log2(hz / 500 + 1) - 60 * t / along(ROOM_DECAY, hz))
    tail = signal.istft(z * decay, SR, nperseg=256)[1]
    delayed = np.pad(x, (300, 0))  # samples before the echo
    return signal.fftconvolve(delayed, tail / np.linalg.norm(tail))[:N]


def quiet():
    """Stationary background: coloured noise of room air and hiss, with a wavering mains hum."""
    air_db, hum_hz, hum_db = -52.5, 121, -60
    phase = 2 * np.pi * hum_hz * np.arange(N) / SR + 1.7 * wobble(13)
    hum = convert_level_to_amplitude(hum_db + 1.1 * wobble(15)) * np.sqrt(2) * np.sin(phase)
    return convert_level_to_amplitude(air_db) * noise(AIR_SPECTRUM) + hum


def scene():
    """Radiation and superposition: a machine too small for deep bass, its echo and the quiet around it."""
    machine = hammer() + advance() + wheel_turns() + rattle() + carriage_return() + thumps()
    machine = filtered(machine, lambda hz: (1j * hz / (60 + 1j * hz)) ** 2)
    return (machine + convert_level_to_amplitude(-14.0) * room(machine) + quiet())[None]


def top_cut(x):
    """Nothing passes above the cut-off."""
    return signal.sosfilt(signal.butter(12, 16500, fs=SR, output="sos"), x)


def record(dry):
    """Dynamic range control: a fast limiter holds the blows down, then a band limit removes the top."""
    limit, top_hz = .5, 15800  # limit as a share of full scale
    needed = np.minimum(1, limit / (np.abs(dry[0]) + 1e-9))
    gain = uniform_filter1d(minimum_filter1d(needed, size=41), size=41)
    mix = filtered(dry[0] * gain, lambda hz: hz < top_hz)[None]
    return top_cut(mix)


dry = scene()
out = record(dry)
transcribe(out)
```